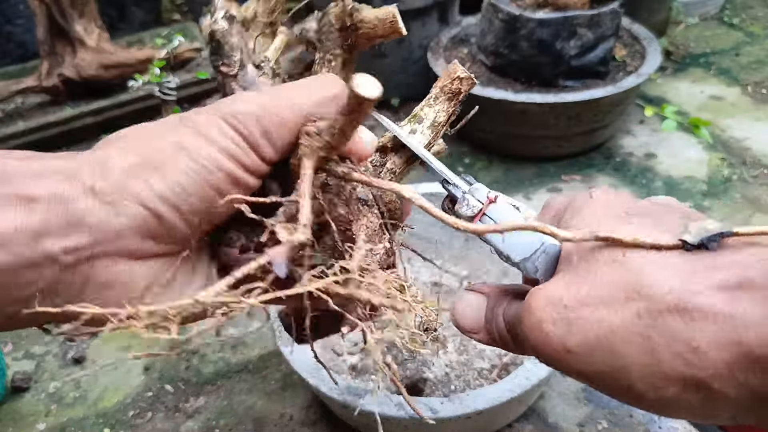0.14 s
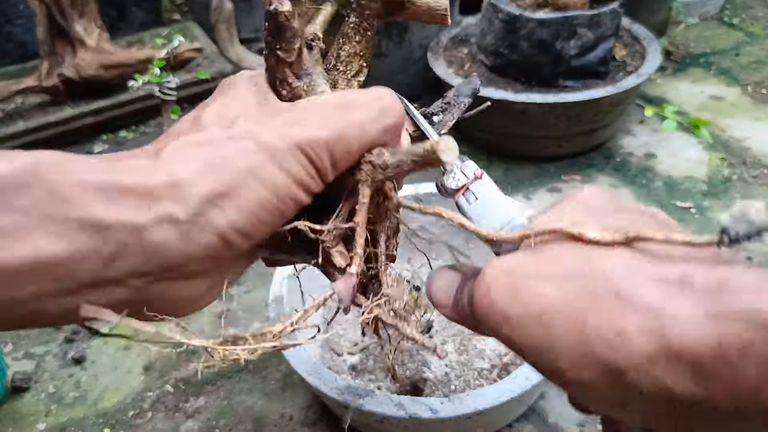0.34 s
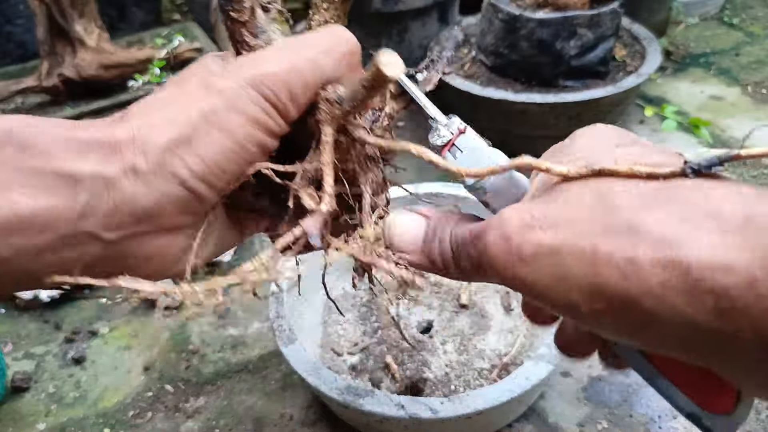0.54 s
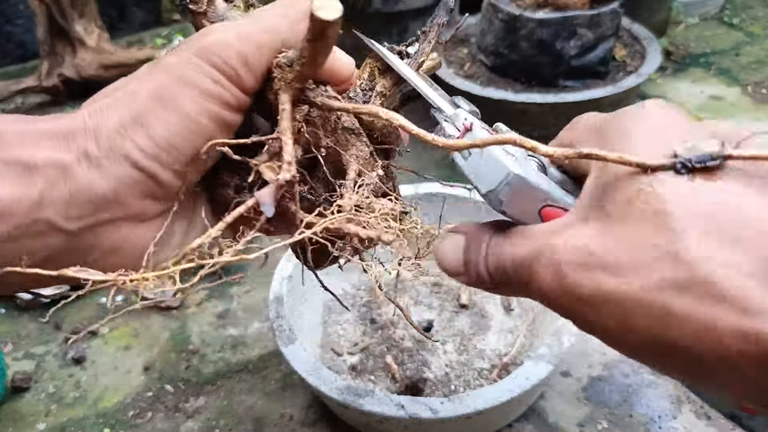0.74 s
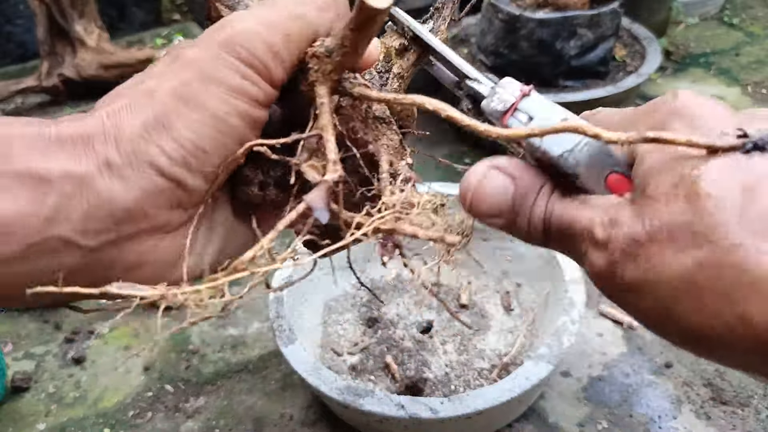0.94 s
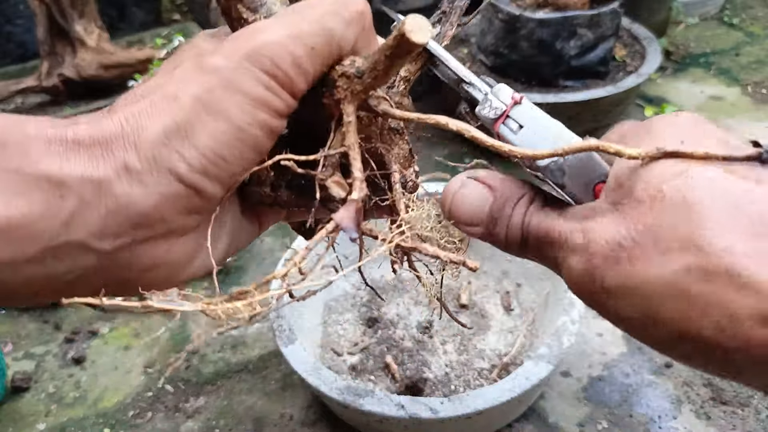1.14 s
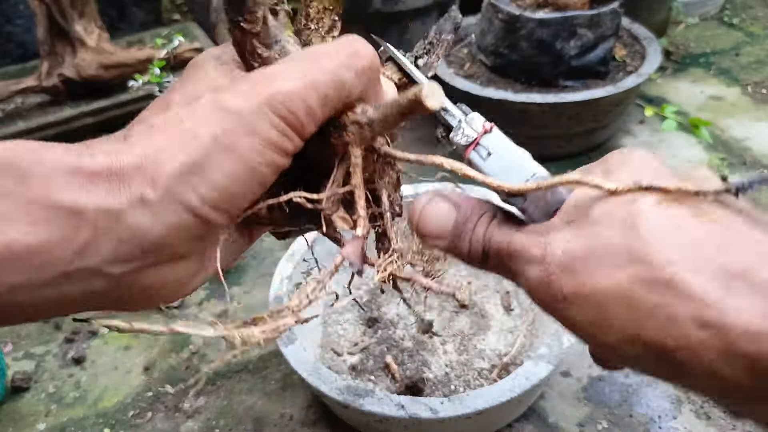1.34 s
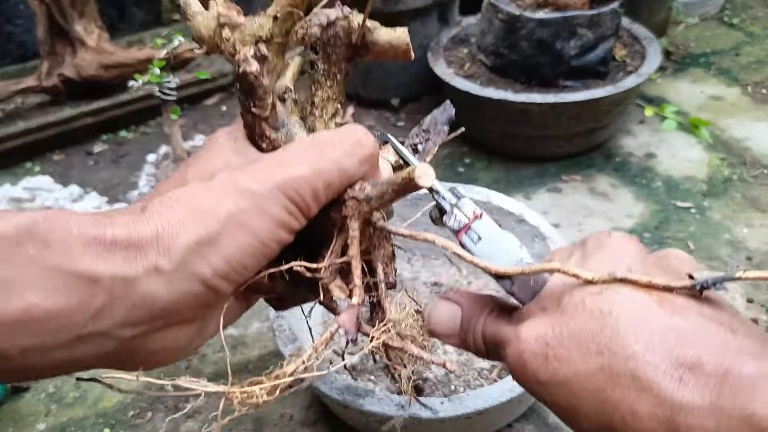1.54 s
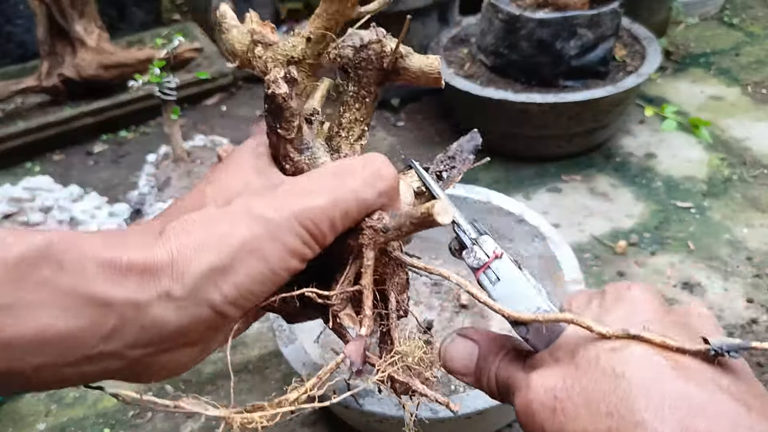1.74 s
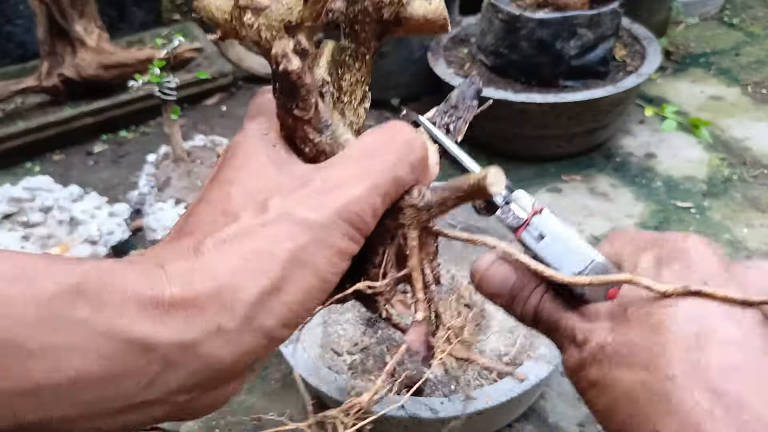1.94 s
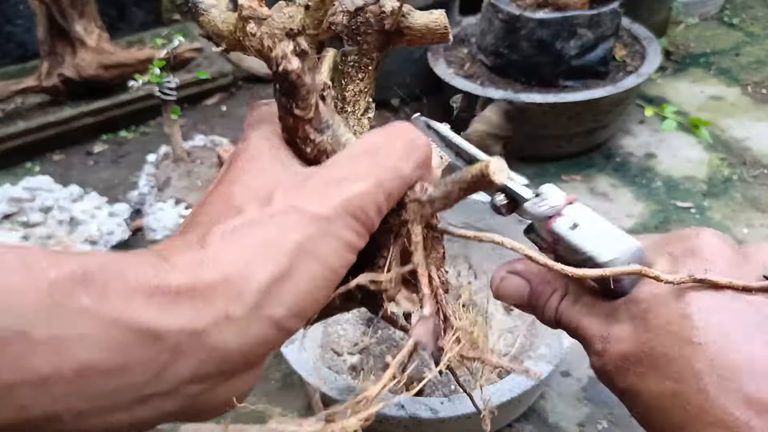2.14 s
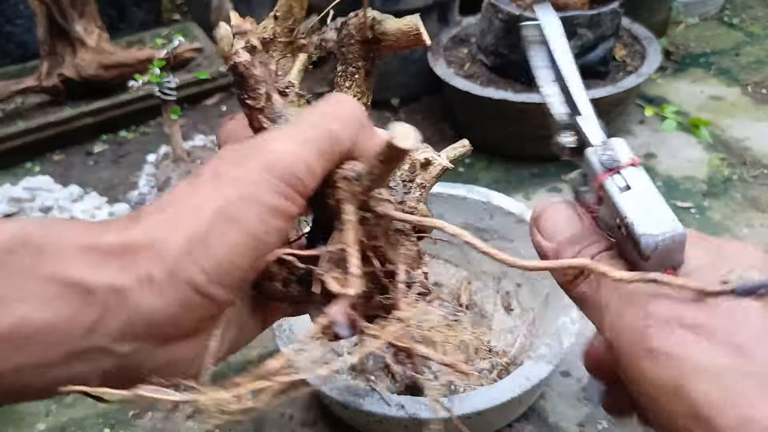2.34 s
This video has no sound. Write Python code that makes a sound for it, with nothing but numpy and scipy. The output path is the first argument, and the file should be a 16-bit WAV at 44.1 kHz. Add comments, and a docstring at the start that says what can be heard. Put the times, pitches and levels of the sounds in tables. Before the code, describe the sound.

Two sharp shear cuts through a tree stump's roots in a quiet yard, faint birds far off

```python
"""Dry roots rustle in the hand over far, low traffic rumble, then pruning shears crack through wood.
Rustle is filtered grains, rumble and air are drifting noise; a hooting bird and falling peeps sound far off.
Two full cuts and smaller fibre snaps are noise bursts ringing the modes of shears and stump.
The blade sings and the wood knocks as damped sines; a walled yard answers with sparse echoes."""
import sys
import numpy as np
from scipy import signal
from scipy.io import wavfile
from scipy.ndimage import uniform_filter1d

SR = 44100
rng = np.random.default_rng(int(sys.argv[2]) if len(sys.argv) > 2 else 0)


def makeup_ratio(level_db):
    """Linear amplitude ratio for a level in decibels (20 dB per factor of ten)."""
    decades = np.asarray(level_db, float) / 20
    return 10 ** decades


def transcribe(signal):
    """Save signal, clipped to [-1, 1], as a 16-bit WAV file at the path in sys.argv[1]."""
    frames = np.atleast_2d(signal).T
    limited = np.clip(frames, -1, 1)
    pcm = np.round(limited * 32767).astype(np.int16)
    wavfile.write(sys.argv[1], SR, pcm)


N = 110250


def evened(x):
    """Scales to rms 1."""
    return x / np.sqrt(np.mean(x ** 2) + 1e-20)


def read(points, hz):
    """Reads a spectrum on a log-frequency axis."""
    f, value = np.transpose(points)
    return np.interp(np.log(hz + 1), np.log(f + 1), value)


def level(curve, axis=1):
    """Gain over time from one dB column of a curve."""
    columns = np.transpose(curve)
    return makeup_ratio(np.interp(np.arange(N) / SR, columns[0], columns[axis]))


def add(mix, start_s, sound):
    """Mixes a sound in at its start time."""
    part = mix[round(start_s * SR):][:len(sound)]
    part += sound[:len(part)]


def coloured(x, points):
    """Causal minimum-phase filter with the given spectrum."""
    hz = abs(np.fft.fftfreq(4096, 1 / SR))
    log_gain = np.log(makeup_ratio(np.maximum(read(points, hz), -100)))
    response = np.exp(np.conj(signal.hilbert(log_gain)))
    taps = np.fft.ifft(response).real[:2048]
    return signal.oaconvolve(x, taps)[:len(x)]


def resonate(x, hz, width_hz):
    """Resonance that follows the curve hz: shift down to zero, smooth, shift back up."""
    turn = np.exp(2j * np.pi * np.cumsum(hz * np.ones(len(x))) / SR)
    r = np.exp(-np.pi * width_hz / SR)
    return 2 * (turn * signal.lfilter([1 - r], [1, -r], x / turn)).real


def patchy(points, patchy_db):
    """Noise of a given spectrum whose level drifts in patches over time and pitch."""
    a, b, patches = rng.standard_normal((N // 256 + 5, 513, 3)).T
    patches = uniform_filter1d(patches, size=8, axis=0)  # across pitch
    patches = evened(uniform_filter1d(patches, size=10, axis=1))  # across time
    spectrum_db = read(points, np.fft.rfftfreq(1024, 1 / SR))[:, None]
    z = (a + 1j * b) * makeup_ratio(spectrum_db + patchy_db * patches)
    return evened(signal.istft(z, nperseg=1024, noverlap=768)[1][:N])


def tones(rows):
    """Soft notes, each on one pitch that noise makes waver."""
    waver_width_hz, waver_depth = 82, 0.026  # depth: rms fraction of the pitch
    out = np.zeros(N)
    for start_s, length_s, level_db, pitch_hz in rows:
        u = np.linspace(0, 1, round(length_s * SR))
        waver = evened(resonate(rng.standard_normal(len(u)), 0, waver_width_hz))
        turns = np.cumsum(pitch_hz * (1 + waver_depth * waver)) / SR
        swell = np.sin(np.pi * u) ** .5
        add(out, start_s, makeup_ratio(level_db + 6.5) * swell * np.sin(2 * np.pi * turns))
    return out


def damped_swing(level_db, pitch_hz, t60_ms):
    """One struck mode: a sine dying exponentially, its treble softened."""
    t = np.arange(6000) / SR
    swing = -makeup_ratio(level_db + 3 - 60000 * t / t60_ms) * np.sin(2 * np.pi * pitch_hz * t)
    return signal.lfilter(*signal.butter(2, 4800, fs=SR), swing)


def rustle():
    """Tiny scratches of dry roots and falling grit, following the hand."""
    # the hand's movement: time_s, level_db, treble_level_db
    hand = [(0, -53.5, -69), (.06, -66, -81), (.12, -72, -86), (.2, -64.5, -78), (.26, -66, -80),
            (.5, -73, -130), (.6, -58.5, -73), (.68, -73, -96.5), (.88, -68, -86.5), (.95, -65, -82),
            (1.0, -59, -67), (1.09, -66.5, -86), (1.25, -72, -92.5), (1.28, -67.5, -77.5),
            (1.37, -77.5, -95.5), (1.39, -62, -77), (1.46, -63.5, -72.5), (1.53, -60, -80),
            (1.68, -59, -74), (1.77, -64, -89), (1.86, -70, -88), (1.91, -63, -72.5), (1.97, -68.5, -96),
            (2.02, -73.5, -78), (2.08, -73, -94.5), (2.13, -63, -77.5), (2.3, -56, -77),
            (2.4, -51.5, -69.5), (2.5, -62.5, -77)]
    # spectrum of the rustle: hz, relative level_db per Hz
    body_colour = [(180, -35), (300, -12), (395, -5), (829, -14), (1140, -6), (1460, -9), (2780, -6.5),
                   (6510, -18.5), (8000, -42.5), (10400, -68.5), (17600, -120)]
    # spectrum of its treble: hz, relative level_db per Hz
    treble_colour = [(4410, -27), (7500, 3.5), (8120, -6.5), (11100, 0), (13800, -2), (15100, -1.5),
                     (16000, -3)]
    grains_per_s, grain_spread_db, grain_ms = 3700, -1.5, 1.8
    size = makeup_ratio(grain_spread_db * np.minimum(rng.exponential(1, N), 5))
    grains = size * (rng.random(N) < grains_per_s / SR)
    swell = signal.lfilter([1], [1, -np.exp(-1000 / (grain_ms * SR))], grains)  # each grain dies away
    grit = swell * rng.standard_normal(N)
    body = level(hand) * evened(coloured(grit, body_colour))
    treble = level(hand, axis=2) * evened(coloured(grit, treble_colour))
    return body + treble


def air():
    """Steady open air: noise with a gently drifting colour."""
    # spectrum of the air: hz, relative level_db per Hz
    air_colour = [(180, -34.5), (300, -10.5), (490, -3.5), (869, -22), (1200, -5.5), (1540, -28),
                  (1960, -15.5), (4250, -15.5), (8790, -37.5), (15100, -40.5), (17000, -45.5)]
    return makeup_ratio(-69) * patchy(air_colour, patchy_db=3.0)


def traffic_rumble():
    """Far traffic: deep patchy noise that swells and sinks."""
    # spectrum of the rumble: hz, relative level_db per Hz
    rumble_colour = [(12, -53.5), (20, -18), (43, -28), (75, 1.5), (119, -2), (341, -14), (532, -19.5),
                     (831, -20.5), (900, -17.5), (1170, -39), (1980, -120)]
    # swells of the rumble: time_s, level_db
    swells = [(0.0, -59.5), (0.35, -60.5), (0.46, -55.5), (0.84, -63.5), (1.01, -60), (1.13, -59.5),
              (1.43, -62.5), (1.69, -55.5), (2.03, -61), (2.25, -57), (2.37, -50), (2.5, -54.5)]
    return level(swells) * patchy(rumble_colour, patchy_db=1.63)


def hoots():
    """A far bird hoots: short wavering near-sine notes."""
    # hoots: start_s, length_s, level_db (before the note's 6.5 dB lift), pitch_hz
    hoot_notes = [(.015, 0.048, -67, 1074), (.06, 0.057, -65, 1220), (.145, 0.057, -65.5, 1164),
                  (.42, 0.1, -66.5, 1214), (.55, 0.044, -69.5, 915), (.665, 0.091, -66.5, 1225),
                  (.76, 0.047, -69.5, 1156), (.915, 0.0099, -62, 988), (1.2, 0.11, -68.5, 1230),
                  (1.375, 0.048, -69, 1038), (1.55, 0.076, -65, 1136), (1.7, 0.15, -73.5, 1200)]
    return tones(hoot_notes)


def peeps():
    """A small bird's breathy peeps: noise through a narrow resonance that slides down and levels out."""
    # peeps: start_s, length_s, level_db, first_hz, last_hz, middle of the slide (0-1), steepness
    peep_notes = [(0.075, 0.06, -72, 4900, 4800, .5, 2.2), (1.1, 0.19, -68, 6050, 3720, .38, 3),
                  (1.36, .21, -69.5, 5350, 3150, .45, 1.6)]
    width_hz, echo_db = 600, 6
    direct = np.zeros(N)
    for start_s, length_s, level_db, first_hz, last_hz, middle, steepness in peep_notes:
        u = np.linspace(0, 1, round(length_s * SR))
        hz = last_hz + (first_hz - last_hz) * np.exp(-(u / middle) ** steepness)
        breath = resonate(rng.standard_normal(len(u)), hz, width_hz)
        tone = evened(resonate(breath, hz, width_hz))
        add(direct, start_s, makeup_ratio(level_db) * np.sin(np.pi * u) ** .5 * tone)
    return direct + makeup_ratio(echo_db) * yard(direct)


def yard(x):
    """Walls return sparse echoes of random sign, each band dying at its own speed."""
    # decay of the yard: hz, t60_s
    decay = [(150, 0.2), (800, 0.22), (2500, 0.37), (5500, 0.27), (11000, 0.25), (16000, .3)]
    # colour of the echoes, and a steep treble cutoff near 16 kHz: hz, gain_db
    colour_and_cutoff = [(200, 6), (800, -3.5), (1500, -3), (2500, -0.5), (3500, 0.5), (5000, -0.5), (6500, -2),
                         (8500, -6.5), (11000, 0), (15700, -2), (16200, -29.5)]
    gap_s, lumps_db = 0.0028, 2.8
    far_wall_s, far_wall_spread_s, far_wall_db = 0.04, 0.01, 1.5  # a cluster of stronger echoes
    taps = np.zeros(SR)
    at = np.arange(0, SR - 20, 20)  # one echo in every 20 samples
    taps[at + rng.integers(0, 20, len(at))] = rng.choice([-1., 1.], len(at))
    from_far_wall = (np.arange(SR) / SR - far_wall_s) / far_wall_spread_s
    taps *= makeup_ratio(far_wall_db * np.exp(-from_far_wall ** 2))
    taps *= makeup_ratio(lumps_db * evened(uniform_filter1d(rng.standard_normal(SR), size=70)))
    hz, t, z = signal.stft(taps, SR, nperseg=256)
    dying = z * makeup_ratio(-60 * t / read(decay, hz)[:, None])
    tail = signal.istft(dying, SR, nperseg=256)[1]
    tail = np.append(np.zeros(round(gap_s * SR)), tail / np.linalg.norm(tail))
    return coloured(signal.fftconvolve(x, tail)[:N], colour_and_cutoff)


def ring(drive, low_db, high_db, fizz_db, blurred=False):
    """Modes and treble fizz excited by a drive; blurred = the modes melted into one smooth colour."""
    # modes of shears and stump: pitch_hz, width_hz, level_db
    modes = [(333, 73, -12), (672, 110, -8.5), (960, 101, -6), (1281, 150, -11.5), (1700, 150, -3.5),
             (2138, 160, -5.5), (2396, 376, -6), (2800, 480, -3.5), (3355, 223, -8), (3763, 190, -9),
             (4456, 190, -9), (4797, 200, -12.5), (5846, 540, -9), (6780, 2900, -22.5)]
    # spectrum of the treble fizz: hz, relative level_db per Hz
    fizz_colour = [(4120, -27.5), (7000, -7), (7480, -11.5), (9520, -9.5), (10600, -3.5), (13600, -8.5),
                   (15200, -2), (16100, -12), (17000, -39)]
    low_below_hz, high_above_hz, detune = 2300, 4000, .015
    hz, width_hz, db = np.transpose(modes)
    gains = makeup_ratio(db + low_db * (hz < low_below_hz) + high_db * (hz > high_above_hz))
    if blurred:
        grid = np.geomspace(50, 20000, 200)[:, None]
        distance = 2 * (grid - hz) / (width_hz * 3)  # modes three times as wide
        power = (gains ** 2 / (1 + distance ** 2)).sum(1)
        body = coloured(drive, np.c_[grid[:, 0], 10 * np.log10(power)])
    else:
        body = np.zeros(len(drive))
        shift = 1 + detune * rng.uniform(-1, 1, len(hz))
        for k in range(len(hz)):
            body += (-1) ** k * gains[k] * resonate(drive, hz[k] * shift[k], width_hz[k])
    body = signal.lfilter(*signal.butter(4, 7500, fs=SR), body)
    return evened(body) + makeup_ratio(fizz_db - 0.5) * evened(coloured(drive, fizz_colour))


def snap(peak_db, burst_ms, *colour):
    """Fibres part in a short dying burst; returns the direct sound and the blurred click for the walls."""
    burst_shape, first_click = 1.2, 11
    t = np.arange(2048) / SR
    click = 1. * (t == 0)
    burst = rng.standard_normal(len(t)) + first_click * click
    burst *= np.exp(-(1000 * t / burst_ms) ** burst_shape)
    direct = ring(burst, *colour)
    gain = makeup_ratio(peak_db) / abs(direct).max()
    return gain * direct, gain * ring(click, *colour, blurred=True)


def fibre_snaps(near, walls):
    """Cuts and smaller snaps of root fibre, sent to the near sound and to the walls."""
    # snaps: start_s, peak_db, burst_ms, low_modes_db, high_modes_db, fizz_db (lowered 0.5 dB in the ring)
    snaps = [(0.2068, -40.5, 10, 0, -2, -16), (0.2165, -24.5, 2.9, -12.5, -2.5, -8.5),
             (0.2361, -17, 3.8, -6, 20, -7.5), (0.3043, -29, 3, 5, 5.5, -5), (0.3114, -33, 2, -13, -3, -6),
             (0.3198, -30.5, 5.6, 4.5, 2, -11), (0.3343, -9.5, 1.9, -3, -2, -16),
             (0.3382, -1.5, 4.2, -2, -3, -19), (0.537, -54, 1.06, -10, 4, 12),
             (0.6052, -25.5, 2.5, -0.5, -1, -11.5), (0.616, -43.5, 2.2, 20, 14, -11),
             (0.657, -48, 1.5, -11, -8, 21.5), (0.8073, -29, 1.4, 8.5, -2, -26.5),
             (0.9974, -32, 2.1, -1, 1, -23.5), (1.5061, -25.5, 6, -30.5, 3.5, -8),
             (1.5943, -39.5, 1.7, -6.5, -23, -22.5), (1.626, -48.5, 1.6, -7.5, -28, -17.5),
             (1.6570, -46, 3.4, -5, -13, -15), (1.6790, -46, 2.6, -2.5, -9, -22),
             (2.0227, -40.5, 4.6, -7, -10.5, -25), (2.1616, -28.5, 3.9, -3.5, 1, -7.5),
             (2.1917, -25.5, 10, 9, 4, -19), (2.1981, -10, 6.4, -13, -9, -20),
             (2.2002, -5, 2, -6.5, 1, -17.5), (2.3516, -30.5, 5, -2, -1, -27),
             (2.3660, -46, 2, -15, 4, -30), (2.3911, -35, 4.4, -14, 1, -16),
             (2.4046, -34.5, 2.4, 1, -10, -20), (2.459, -45.5, 4.5, -15, -1, -10)]
    for start_s, *row in snaps:
        direct, blurred = snap(*row)
        add(near, start_s, direct)
        add(walls, start_s, blurred)


def blade_rings(near, walls):
    """Soft-starting blade rings choked by the grip; the walls get them shorter and so wider in pitch."""
    # the blade sings after some clicks, its pitch set by how far the shears are open:
    # start_s, level_db (before rise, grip and the swing's 3 dB lift), pitch_hz, t60_ms (before the grip)
    rings = [(.2170, -32, 2970, 22), (0.2368, -24.5, 2990, 19), (.2462, -35, 2650, 12),
             (0.3034, -31, 2715, 15), (.3120, -39, 2790, 14), (0.6064, -27, 2480, 11.3),
             (1.5060, -22.5, 2730, 45), (2.0238, -50.5, 2270, 28), (1.5061, -35.5, 1680, 16.2),
             (1.5059, -34, 4280, 17), (2.2002, -8.5, 2780, 22), (2.2003, -5, 3656, 11.5),
             (2.3511, -36, 2220, 17), (2.3504, -26, 3380, 7.2), (2.393, -30, 2370, 16)]
    rise_ms, grip_ms, blur, wall_db = .5, 5.8, 6, 3.5
    ms = 1000 * np.arange(6000) / SR
    shape = (1 - np.exp(-ms / rise_ms)) * np.exp(-(ms / grip_ms) ** 4)
    for start_s, level_db, pitch_hz, t60_ms in rings:
        add(near, start_s, shape * damped_swing(level_db, pitch_hz, t60_ms))
        add(walls, start_s, damped_swing(level_db + wall_db, pitch_hz, t60_ms / blur))


def wood_knocks(near, walls):
    """Dull knocks on the wood, each one damped swing."""
    # knocks: start_s, level_db (before the swing's 3 dB lift), pitch_hz, t60_ms
    knocks = [(0.3382, -41.5, 94, 90), (0.604, -49.5, 311, 52), (0.8069, -20.5, 1096, 4.5),
              (0.8087, -40.5, 463, 27), (0.83, -36.5, 380, 17), (0.837, -52, 415, 83),
              (0.9977, -43, 497, 19), (1.685, -48, 384.5, 34), (2.2010, -36, 97.6, 42)]
    wall_db = -3
    for start_s, *row in knocks:
        knock = damped_swing(*row)
        add(near, start_s, knock)
        add(walls, start_s, makeup_ratio(wall_db) * knock)


def engine_hums():
    """Low hums from far-off engines: soft wavering notes."""
    # hums: start_s, length_s, level_db (before the note's 6.5 dB lift), pitch_hz
    hum_notes = [(.9, .07, -61, 105), (1.03, .17, -62, 140), (2.2, .3, -69, 390), (2.3, .075, -57, 210),
                 (2.33, .12, -57, 118)]
    return tones(hum_notes)


def scene():
    """Near cuts with the yard's echo over rustle, birds and background."""
    far = rustle() + air() + traffic_rumble() + hoots() + peeps() + engine_hums()
    near, walls = np.zeros(N), np.zeros(N)
    fibre_snaps(near, walls)
    blade_rings(near, walls)
    wood_knocks(near, walls)
    echo_db = -10.5
    return (near + makeup_ratio(echo_db) * yard(walls) + far)[None]


def band_limit(x):
    """A steep low-pass at the top of the band."""
    return signal.sosfilt(signal.butter(12, 17130, fs=SR, output="sos"), x)


def record(dry):
    """The small microphone drops the deep bass."""
    low_cut_hz = 84
    heard = signal.lfilter(*signal.butter(2, low_cut_hz, "high", fs=SR), dry)
    return band_limit(heard)


dry = scene()
out = record(dry)
transcribe(out)
```